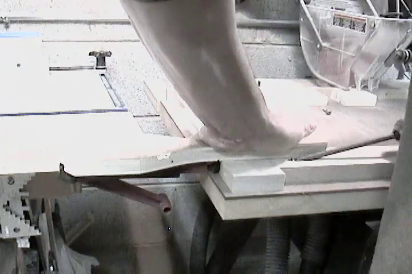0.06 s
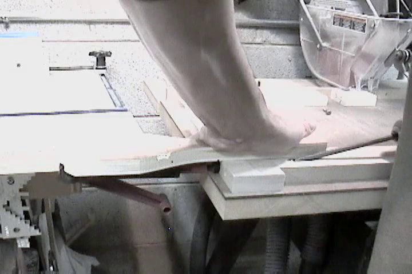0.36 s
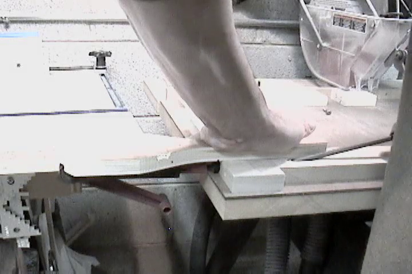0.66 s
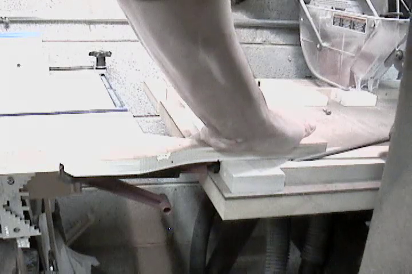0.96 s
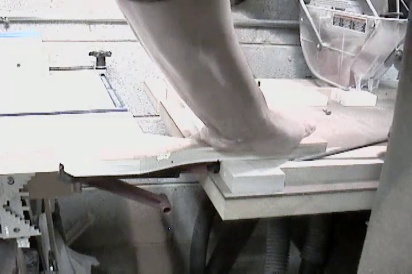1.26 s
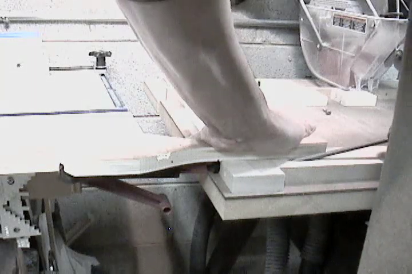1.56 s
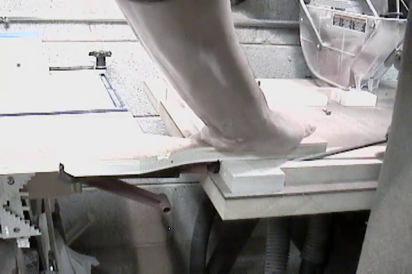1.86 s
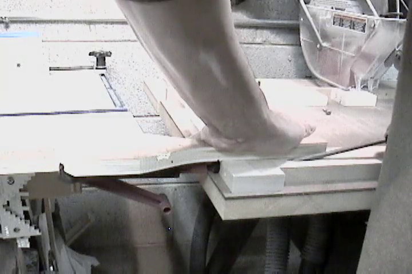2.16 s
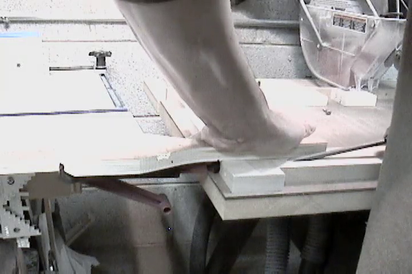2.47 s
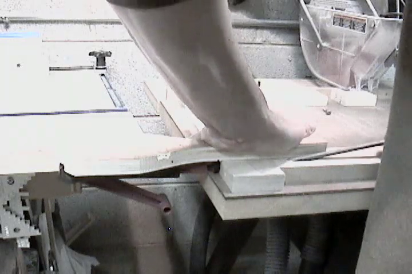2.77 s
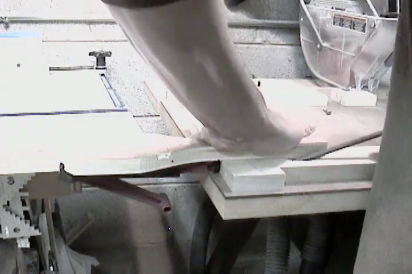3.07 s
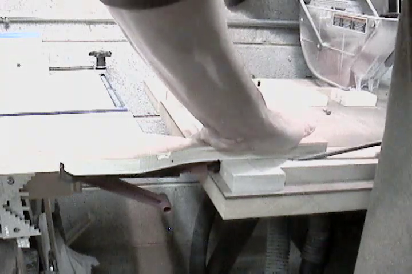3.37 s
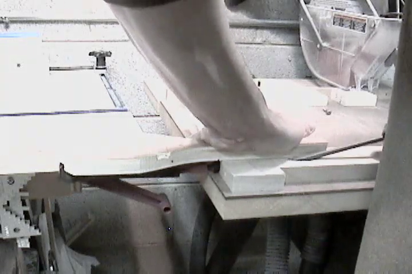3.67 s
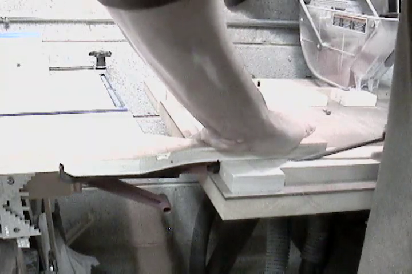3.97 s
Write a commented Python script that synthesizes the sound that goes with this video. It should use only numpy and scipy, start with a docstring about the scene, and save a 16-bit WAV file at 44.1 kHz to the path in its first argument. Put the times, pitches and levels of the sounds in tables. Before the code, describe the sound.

A small electric drill hums, rattles and grinds near the microphone, then lets go with a sharp snap and brakes. A few bursts of wooden clatter thud on a workshop bench before the drill briefly restarts.

```python
"""A workshop, one microphone close to a small geared power tool, probably a cordless drill.
It starts under load: the rotor hums, the gears whine and rattle, the bit grinds. At 2.45 s the load lets
go with a sharp snap; the tool speeds up, then brakes. From 2.9 s wood knocks and clatters, and the bench
thuds and booms under it. Just before 3.9 s the tool starts again."""
import sys
import numpy as np
from scipy import signal
from scipy.fft import rfft, irfft
from scipy.io import wavfile
from scipy.ndimage import uniform_filter1d

SR = 44100
rng = np.random.default_rng(int(sys.argv[2]) if len(sys.argv) > 2 else 0)


def transcribe(signal):
    """Save signal, clipped to [-1, 1], as a 16-bit WAV file at the path in sys.argv[1]."""
    frames = np.atleast_2d(signal).T
    limited = np.clip(frames, -1, 1)
    pcm = np.round(limited * 32767).astype(np.int16)
    wavfile.write(sys.argv[1], SR, pcm)


N = 176400

# spectrum of the quiet workshop: frequency_hz, level_db
ROOM_TONE_SPECTRUM = [(15, -46), (25, -31), (49, -6.5), (66, -11), (125, -7), (154, -13), (278, -12),
                      (309, -14.5), (394, -16), (8550, -34.5), (15000, -49)]

# blows of wood on the bench: start_s, wood_db, crack_db, thud_db, boom_db, tick_db
KNOCKS = [(2.9405, 2, 3, -28, -21, 7), (2.947, -10, -10, -23, -26, -12), (2.9662, -1, -0.5, 0, -30, 2),
          (2.986, -13, -26, -12, -35, -21), (3.004, 0.5, 5, -13, -33, -22), (3.015, -16, -0.5, 3, -17, 1),
          (3.3345, -4, -2, -15, -6.5, -6), (3.340, -5, 7, -9, -19, -5), (3.345, -6, -0.5, -20, -23, -11),
          (3.3515, -6, 4, -26, -13, -4), (3.357, -2, -4, 4, -2.5, -12), (3.369, -13, -5.5, -19, -24, -21),
          (3.4505, -24, -15, -8, -21, -29), (3.458, -23, -21, -18, -26, -30),
          (3.835, -32, -16, -38, -36, -33), (3.8653, -22, -2.5, -34, -35, -7),
          (3.8818, -8, 7.5, -24, -22, -9), (3.893, -6, -7, -25, -25, -14)]
# modes of the wood: pitch_hz, level_db, t60_s
WOOD_MODES = [(480, -16, .05), (668, -8, .04), (824, -1, .036), (980, -4, .035), (1340, -9, .025),
              (1590, -9, .025), (2020, -10, .03)]
# booming modes of the bench: pitch_hz, level_db, t60_s
BENCH_MODES = [(263.8, -0.5, 0.41), (296.5, -4.5, 0.24), (386.4, -3.5, 0.14), (480, -16.5, 0.52),
               (560, -15, 0.38), (785, -16, 0.29), (1020, -21, 0.4)]
# deep modes of the bench frame: pitch_hz, level_db, t60_s
FRAME_MODES = [(125, -3.5, 0.23), (143.3, -1.5, 0.43), (198, 7.5, 0.13)]
# bright modes of a hard corner: pitch_hz, level_db, t60_s
CORNER_MODES = [(3700, -2, .025), (4200, 0, .015), (4600, -6, .022), (8300, -9, .018), (11700, -3, .005)]
# spectrum of a blow's crack: frequency_hz, level_db
CRACK_SPECTRUM = [(100, -8), (500, 2.5), (1200, 10), (2500, 5.5), (3300, -1.5), (4400, 0.5), (6000, -9.5),
                  (8500, -9.5), (12000, -23), (15000, -35)]
# blows on a hard edge: start_s, level_db
CLACKS = [(2.4458, -19), (3.0044, -31), (3.0079, -29), (3.3515, -40)]
# modes of that edge: pitch_hz, level_db, t60_s
EDGE_MODES = [(2030, -9.5, 0.022), (2400, 0.5, 0.011), (2685, -0.5, 0.011), (3210, -6, 0.028),
              (4100, -10, 0.022)]
# spectrum of the snap and of a corner's contact: frequency_hz, level_db
SNAP_SPECTRUM = [(300, -20), (1200, -4), (2300, 3), (3000, 2), (4200, -6), (6000, -4), (8500, 3),
                 (11500, 0), (13000, -10), (15500, -25)]

# speed of the rotor: time_s, turns_per_s
ROTOR_SPEED = [(0, 241.6), (.3, 242.6), (.7, 242.2), (1.2, 241), (1.75, 240.3), (1.9, 238.8), (2.15, 238),
               (2.37, 238.8), (2.5, 246.5), (2.6, 250), (2.75, 248), (3.86, 120), (3.92, 185), (4, 226)]
# drive of the motor: time_s, gain_db
MOTOR_DRIVE = [(0, -0.5), (2.42, -1), (2.5, -2.5), (2.62, -1), (2.69, -2), (2.725, -15), (2.76, -38.5),
               (3.84, -50), (3.868, -19), (3.89, -11.5), (3.95, -5), (4, -3)]
# load on the bit: time_s, gain_db
BIT_LOAD = [(0, -0.5), (2.15, 0.5), (2.34, 2.5), (2.43, 0.5), (2.48, -10), (2.7, -33), (3.88, 9), (4, 1.5)]
# hum of the rotor: time_s, level_db
HUM_LEVEL = [(0, -46), (.7, -44.5), (1.3, -42.5), (1.8, -42), (2.3, -44), (2.5, -46.5), (2.68, -49.5),
             (2.77, -64), (2.92, -83), (3.85, -90.5), (3.9, -73), (4, -49)]
# overtones of the rotor: speed_multiple, level_db
ROTOR_OVERTONES = [(2, -54), (3, -52.5), (4, -69), (5, -52.5)]
# tones of the gear whine: speed_multiple, level_db
GEAR_TONES = [(1.1, -59), (1.56, -60), (2.43, -59), (2.75, -56), (4.4, -55.5), (5.53, -49), (6.55, -50),
              (10, -53), (11, -50), (11.24, -49), (12, -47), (14.22, -47), (15, -47.5), (15.83, -47),
              (16.38, -48), (19.7, -54), (22, -52.5), (33, -57), (50, -61)]
# strongest gear whistle: time_s, level_db
WHISTLE_LEVEL = [(0, -44), (.2, -42), (.55, -42), (.9, -43.5), (2.3, -44), (2.5, -53)]
# low drone of the tool: time_s, level_db
DRONE_LEVEL = [(0, -72.5), (2.3, -59), (2.6, -72.5)]
# spectrum of gearbox and fan running free: frequency_hz, level_db
GEARBOX_SPECTRUM = [(60, -24), (150, -29), (220, -7), (520, -10.5), (750, -4), (1100, 3), (1650, -5),
                    (2050, -1), (2800, -4), (3800, 2.5), (4700, -6), (6200, -9.5), (7200, -9), (8000, -5),
                    (11200, -11), (12700, -20.5), (14000, -26.5), (15200, -46)]
# spectrum of the grinding bit: frequency_hz, level_db
GRIND_SPECTRUM = [(200, -31), (900, -12), (1350, -7.5), (1900, -8), (2350, -13), (2700, -0.5), (2950, 1.5),
                  (3180, -4), (3500, 4), (4120, -5), (4400, -6), (5300, -4.5), (6200, -13), (9000, -24.5),
                  (13000, -58.5)]
# resonances of the gear housing: pitch_hz, width_hz, gain_db
HOUSING_RESONANCES = [(1378, 46, 0.5), (1620, 64, 3), (2720, 82, -4), (4067, 110, -2.5), (5350, 63, -27),
                      (8000, 180, -8.5), (12000, 200, 1.5)]

ROOM_TONE_DB, ROOM_LOW_T60_S, ROOM_HIGH_T60_S = -63, 0.52, 0.19
TOOL_ROOM_DB, KNOCK_ROOM_DB, SNAP_ROOM_DB = -6.5, -3.5, -11
WOOD_DB, THUD_DB, BOOM_DB, TICK_DB = -30.5, -50.5, -31, -42.5
RING_ATTACK_S, BENCH_ATTACK_S = 0.00026, 0.011
CRACK_DB, CRACK_DECAY_S, CONTACT_DB, CONTACT_DECAY_S = -33.5, 0.0037, -42, 0.00085
SNAP_START_S, SNAP_DB, SNAP_DECAY_S, JOLT_DB = 2.4464, -13.5, 0.0007, -48.5
RATTLE_DB, FAN_DB, GRIND_DB = -36.5, -34.5, -33
TOOTH_SCATTER_DB, TOOTH_WEAR_DB, GRIND_FLUTTER_DB = 2.5, 2, 0.9
SPEED_JITTER, HUM_WAVER_DB, WHINE_WAVER_DB, WHINE_SPREAD_HZ = 0.0012, 0.9, 3, 5.27
WHINE_LOAD_SHARE, OVERTONE_LOAD_SHARE = 0.2, 0.13
TOP_HZ = 15500


def undb(db):
    """Decibels to gain."""
    return 10 ** (np.asarray(db) / 20)


def unit_rms(x):
    """Scale to rms 1."""
    return x / np.sqrt(np.mean(x ** 2))


def curve(rows):
    """Join (time_s, value) rows by straight lines."""
    return np.interp(np.arange(N) / SR, *np.array(rows).T)


def wander(rate_hz):
    """Smooth random motion with rms 1."""
    hold = max(int(SR / rate_hz), 2)
    steps = np.repeat(rng.standard_normal(N // hold + 1), hold)
    return unit_rms(uniform_filter1d(steps, hold)[:N])


def colour(x, spectrum, size=2048):
    """Shape x with a minimum-phase filter of unit power."""
    hz, db = np.array(spectrum).T
    bins_hz = np.maximum(np.fft.rfftfreq(size, 1 / SR), 1)
    gain = undb(np.interp(np.log(bins_hz), np.log(hz), db))
    cepstrum = irfft(np.log(gain))
    cepstrum[1:size // 2] *= 2
    cepstrum[size // 2 + 1:] = 0
    response = irfft(np.exp(rfft(cepstrum)))
    return signal.fftconvolve(x, response / np.linalg.norm(response))[:N]


def ring(blows, modes, attack_s):
    """Blows ring modes that swell and die away; neighbours swing in opposite senses."""
    t = np.arange(SR) / SR
    tones = sum((-1) ** k * undb(db - 60 * t / t60) * np.sin(2 * np.pi * hz * t)
                for k, (hz, db, t60) in enumerate(modes))
    swell = 1 - np.exp(-t / attack_s)
    return signal.fftconvolve(blows, swell * tones)[:N]


def burst(start_s, decay_s):
    """Noise that starts at once and dies away."""
    age = np.arange(N) / SR - start_s
    return (age >= 0) * np.exp(-np.abs(age) / decay_s) * rng.standard_normal(N)


def room_tone():
    """The quiet workshop: a faint, steady rumble and hiss."""
    return undb(ROOM_TONE_DB) * colour(rng.standard_normal(N), ROOM_TONE_SPECTRUM)


def room(x, wet_db, tails=3):
    """Add the workshop's reverberation: the bass lasts longest and the reflections keep shifting."""
    t = np.arange(int(SR * 0.7)) / SR
    onset = np.clip(t / 0.0046, 0, 1)
    shares = np.array([wander(12) for _ in range(tails)])
    wet = 0
    for share in shares / np.linalg.norm(shares, axis=0):
        high, low = rng.standard_normal((2, len(t)))
        low = signal.sosfilt(signal.butter(4, 600, fs=SR, output="sos"), low)
        tail = onset * (high * undb(-60 * t / ROOM_HIGH_T60_S)
                        + 0.97 * low * undb(-60 * t / ROOM_LOW_T60_S))
        wet += share * signal.fftconvolve(x, tail / np.linalg.norm(tail))[:N]
    return x + undb(wet_db) * wet


def knocks():
    """Each blow cracks and rings the wood, hard corners tick; the bench answers with a thud and a boom."""
    wood, thud, boom, tick, crack, contact = np.zeros((6, N))
    for start_s, wood_db, crack_db, thud_db, boom_db, tick_db in KNOCKS:
        at = int(start_s * SR)
        wood[at] = undb(WOOD_DB + wood_db)
        thud[at] = undb(THUD_DB + thud_db)
        boom[at] = undb(BOOM_DB + boom_db)
        tick[at] = undb(TICK_DB + tick_db)
        crack += undb(CRACK_DB + crack_db) * burst(start_s, CRACK_DECAY_S)
        contact += undb(CONTACT_DB + tick_db) * burst(start_s, CONTACT_DECAY_S)
    ringing = ring(wood, WOOD_MODES, RING_ATTACK_S) + ring(tick, CORNER_MODES, RING_ATTACK_S)
    impacts = colour(crack, CRACK_SPECTRUM) + colour(contact, SNAP_SPECTRUM)
    bench = ring(thud, FRAME_MODES, BENCH_ATTACK_S) + ring(boom, BENCH_MODES, BENCH_ATTACK_S)
    return room(ringing + impacts, KNOCK_ROOM_DB) + bench


def clacks():
    """The snap and the hardest knocks ring a stiff edge."""
    blows = np.zeros(N)
    for start_s, level_db in CLACKS:
        blows[int(start_s * SR)] = undb(level_db)
    return room(ring(blows, EDGE_MODES, RING_ATTACK_S), KNOCK_ROOM_DB)


def snap():
    """One bright snap as the load lets go; it jolts the bench."""
    jolt = np.zeros(N)
    jolt[int(SNAP_START_S * SR)] = undb(JOLT_DB)
    crack = undb(SNAP_DB) * colour(burst(SNAP_START_S, SNAP_DECAY_S), SNAP_SPECTRUM)
    return room(crack, SNAP_ROOM_DB) + ring(jolt, FRAME_MODES, BENCH_ATTACK_S)


def tooth_clicks(turns, teeth):
    """One click per tooth: wear repeats every turn, backlash scatters size and timing."""
    at = np.flatnonzero(np.diff(np.floor(turns * teeth)))
    wear = rng.standard_normal(teeth)[np.arange(len(at)) % teeth]
    size, late = rng.standard_normal((len(at), 2)).T
    at = np.clip(at + (1.5 * late).astype(int), 0, N - 1)
    clicks = np.zeros(N)
    clicks[at] = undb(TOOTH_WEAR_DB * wear + TOOTH_SCATTER_DB * size) * rng.choice([-1, 1], len(at))
    return unit_rms(clicks)


def gearbox(turns):
    """Gear teeth rattle over the rush of the fan."""
    rattle = undb(RATTLE_DB) * tooth_clicks(turns, teeth=15)
    fan = undb(FAN_DB) * rng.standard_normal(N)
    return colour(rattle + fan, GEARBOX_SPECTRUM)


def bit(turns, load_db):
    """The bit grinds in fast, fluttering clicks, louder under load."""
    grind = colour(tooth_clicks(turns, teeth=17), GRIND_SPECTRUM)
    return grind * undb(GRIND_DB + load_db + GRIND_FLUTTER_DB * wander(60))


def housing(x):
    """The gear housing sings at a few narrow resonances."""
    return x + sum(undb(db) * signal.lfilter(*signal.iirpeak(hz, hz / width, fs=SR), x)
                   for hz, width, db in HOUSING_RESONANCES)


def gear_tone(turns, multiple, db):
    """One tone at a multiple of rotor speed; its pitch slips and its level wavers."""
    slip = np.cumsum(WHINE_SPREAD_HZ * wander(90)) / SR
    return undb(db + WHINE_WAVER_DB * wander(27.97)) * np.sin(2 * np.pi * (multiple * turns + slip))


def gear_whine(turns, load_db):
    """Gear tones that strengthen under load, joined by a whistle and a low drone."""
    whine = sum(gear_tone(turns, multiple, db + WHINE_LOAD_SHARE * load_db)
                for multiple, db in GEAR_TONES)
    whistle = gear_tone(turns, multiple=16.96, db=curve(WHISTLE_LEVEL))
    drone = gear_tone(turns, multiple=0.73, db=curve(DRONE_LEVEL))
    return whine + whistle + drone


def rotor(turns, drive, load_db):
    """The rotor hums at its turning rate; drive raises its overtones and load damps them."""
    phase = 2 * np.pi * turns
    hum = undb(curve(HUM_LEVEL) + HUM_WAVER_DB * wander(16)) * np.sin(phase)
    overtones = sum(undb(db - OVERTONE_LOAD_SHARE * load_db + wander(14)) * np.sin(multiple * phase)
                    for multiple, db in ROTOR_OVERTONES)
    return hum + drive * overtones


def drill():
    """The tool, close up: its tones arrive dry, its rattle and grinding with some room."""
    turns = np.cumsum(curve(ROTOR_SPEED) * (1 + SPEED_JITTER * wander(25))) / SR
    drive, load_db = undb(curve(MOTOR_DRIVE)), curve(BIT_LOAD)
    tones = rotor(turns, drive, load_db) + drive * gear_whine(turns, load_db)
    noise = drive * housing(gearbox(turns) + bit(turns, load_db))
    noise = room(noise, TOOL_ROOM_DB) / np.hypot(1, undb(TOOL_ROOM_DB))  # the room adds no net power
    return np.sqrt(2) * tones + noise


def scene():
    """Tool, bench and room at one microphone, the same in both channels."""
    mono = drill() + knocks() + clacks() + snap() + room_tone()
    return np.array([mono, mono])


def record(dry):
    """The recorder cuts the top treble steeply."""
    return signal.sosfilt(signal.ellip(8, 0.2, 70, TOP_HZ, fs=SR, output="sos"), dry)


dry = scene()
out = record(dry)
transcribe(out)
```